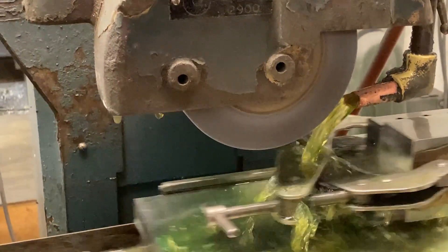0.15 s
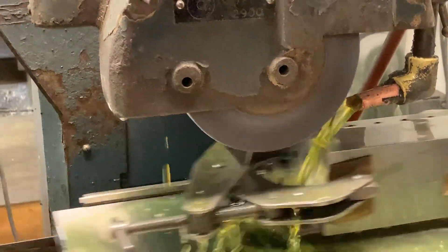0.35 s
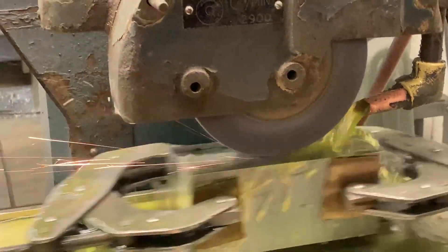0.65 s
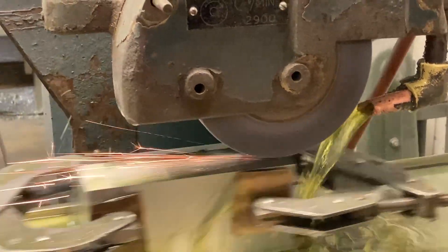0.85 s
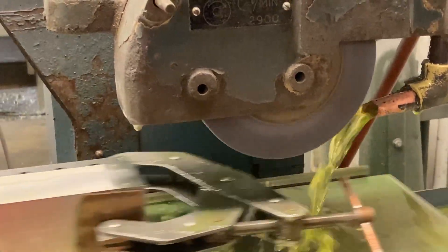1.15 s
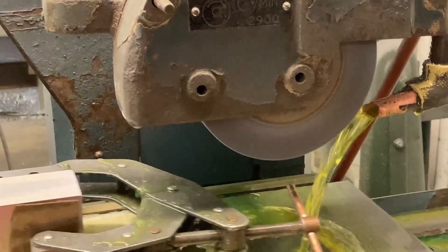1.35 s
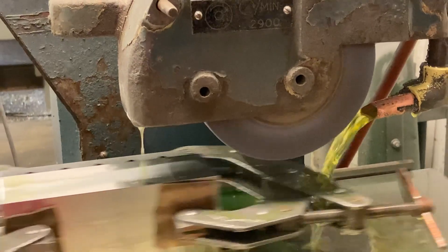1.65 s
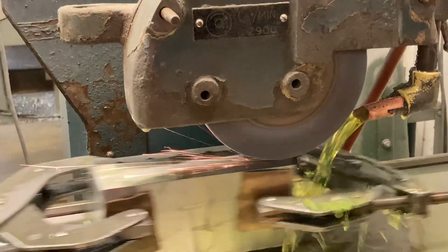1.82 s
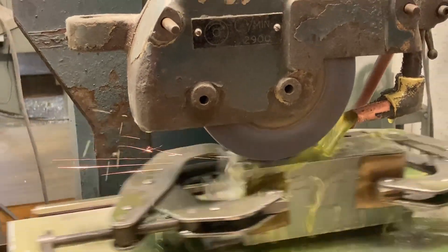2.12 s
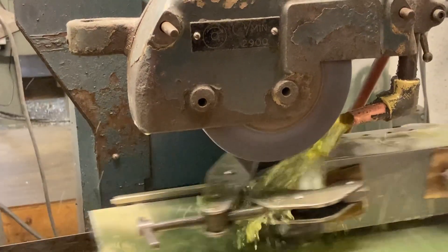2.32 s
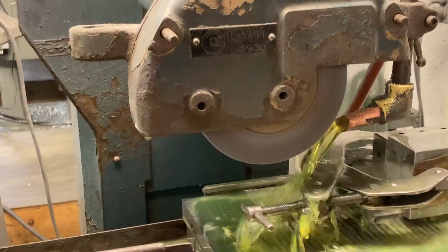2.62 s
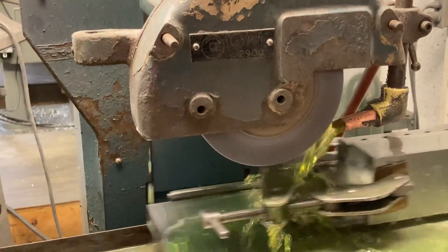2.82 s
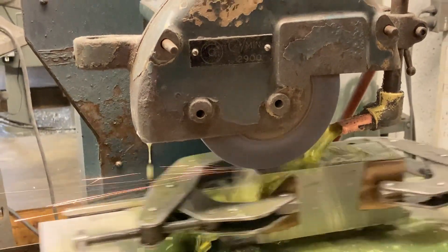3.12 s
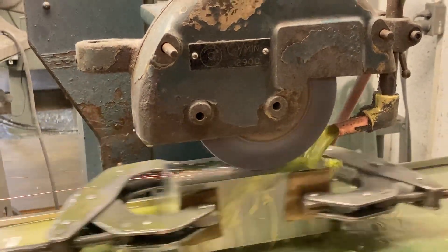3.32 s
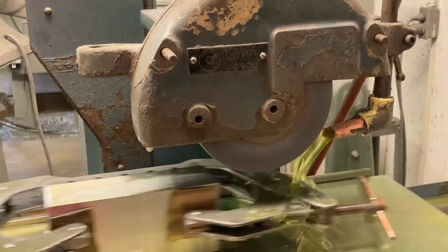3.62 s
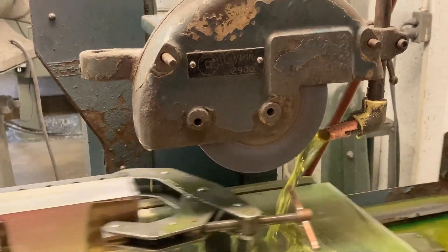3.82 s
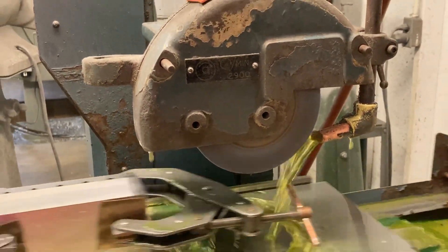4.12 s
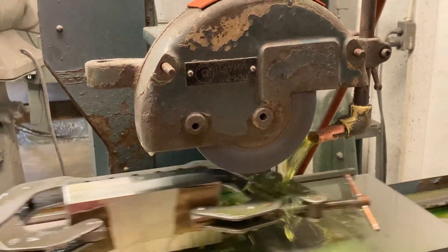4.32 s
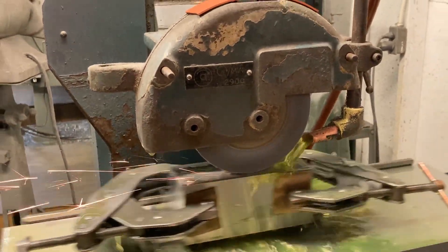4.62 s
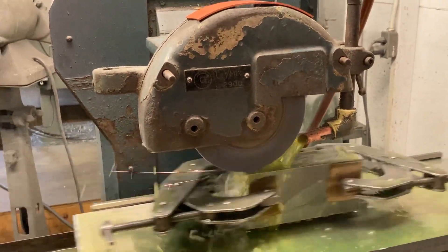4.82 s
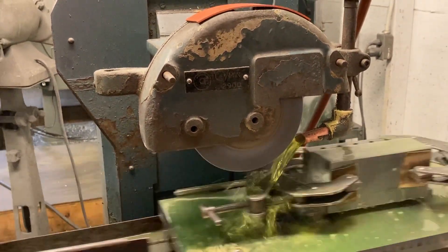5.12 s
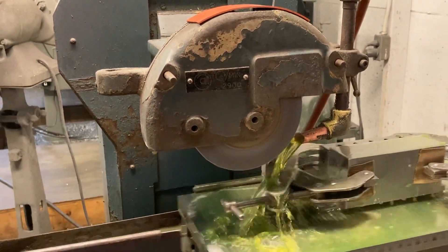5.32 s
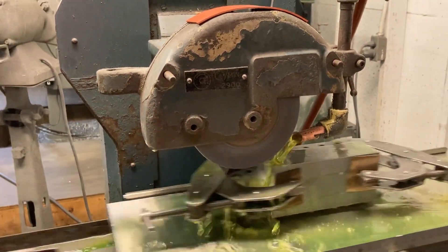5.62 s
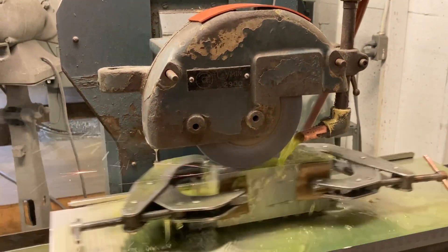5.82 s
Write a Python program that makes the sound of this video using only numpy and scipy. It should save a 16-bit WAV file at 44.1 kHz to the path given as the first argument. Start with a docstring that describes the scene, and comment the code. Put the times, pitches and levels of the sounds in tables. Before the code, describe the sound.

A surface grinder runs close by with a throbbing hum, a motor whine and a light hiss of coolant spray. Five times its wheel scrapes over a steel block with a brief, high, ringing hiss. Between passes a lever clanks, a ratchet rattles quickly and the heavy table reverses with a dull thud. The cycle repeats evenly, with almost no echo.

```python
"""A ratchet rattles over the hum of pump, motor and coolant: a surface grinder at work, close by.
Its table swings to and fro, and five times the wheel scrapes over a steel block, so that wheel,
block and guard sing. At each end a dog knocks the reversing lever, the cross-feed pawl clicks over
its teeth and the table thuds round. Nearby metal and walls add a very short tail."""
import sys
import numpy as np
from scipy import signal
from scipy.fft import rfft, irfft
from scipy.io import wavfile
from scipy.ndimage import uniform_filter1d, map_coordinates

SR = 44100
rng = np.random.default_rng(int(sys.argv[2]) if len(sys.argv) > 2 else 0)


def generate_wav(signal):
    """Clip the signal to [-1, 1] and save it as 16-bit WAV at the path in sys.argv[1]."""
    frames = np.transpose(np.atleast_2d(signal))
    scaled = np.clip(frames, -1, 1) * 32767
    pcm = np.round(scaled).astype(np.int16)
    wavfile.write(sys.argv[1], SR, pcm)


N = 262836
T = np.arange(N) / SR
F = np.arange(N // 2 + 1) * SR / N


def undb(db):
    return 10 ** (np.asarray(db) / 20)


def level(x, db):
    return x * undb(db) / np.sqrt(np.mean(x ** 2))


def through(x, response):
    return irfft(rfft(x) * response, N)


def over_hz(points):
    """A curve through (f/Hz, value) points on a log frequency axis."""
    hz, value = np.transpose(points)
    return np.interp(np.log(F + 1), np.log(hz), value)


def rings(modes):
    """Resonator bank of damped modes (f/Hz, width/Hz, peak level/dB), alternating in polarity."""
    return sum((-1) ** k * undb(db) * 1j * F * width / (hz ** 2 - F ** 2 + 1j * F * width)
               for k, (hz, width, db) in enumerate(modes))


def walk(rate):
    """Smooth random modulator: rate new values a second, spread near 1."""
    hold = int(SR / rate)
    steps = np.repeat(rng.standard_normal(N // hold + 1), hold)
    return 1.3 * uniform_filter1d(uniform_filter1d(steps, hold), hold)[:N]


def gate(spans):
    """Soft gate, open from each row's start to its end."""
    return uniform_filter1d(sum((T > start) & (T < end) for start, end, *_ in spans) * 1., 2000)


def blows(times, db, decay_s, rough):
    """Exciter: each blow is a sharp impact plus a dying scrape, which has the share rough of the energy."""
    size = 2000
    scrape = rng.standard_normal((len(times), size)) * np.exp(-np.arange(size) / SR / decay_s)
    forces = np.sqrt(rough) * scrape / np.sqrt(np.sum(scrape ** 2, axis=1, keepdims=True))
    forces[:, 0] += np.sqrt(1 - rough)
    out = np.zeros(N + size)
    for s, gain, force in zip(times, undb(db), forces):
        out[int(s * SR):int(s * SR) + size] += gain * force
    return out[:N]


def strike(force, body):
    """Rings a body, scaled so that a unit impact peaks near 1."""
    return through(force, body / np.abs(irfft(body[::6])).max())


# stereo image, how alike left and right are (f/Hz, share/0-1)
LIKENESS = [(100, 0.94), (350, 1), (750, 0.89), (1000, 0.23), (1600, 0.21), (2600, 0.12), (5000, 0),
            (6200, 0.7), (7000, 0.4), (8600, 1), (16000, 0.75)]
# EQ of motor rumble, fan and coolant hiss (f/Hz, relative level/dB)
RUMBLE_EQ = [(28, -47), (52, -0.5), (110, -0.5), (230, 1), (310, 0.5), (400, -7.5), (480, -4), (600, -0.5),
             (720, -3.5), (950, -15.5), (1400, -12), (3300, -16.5), (4200, -19.5), (7000, -28.5),
             (11000, -29), (15600, -35.5)]


def motor_and_fan():
    """Stereo noise bed: a wavering rumble and hiss, partly unrelated left and right."""
    alike = over_hz(LIKENESS)
    common, *sides = rfft(rng.standard_normal((3, N)) * undb(1.74 * walk(9.4)))
    noise = np.sqrt(alike) * common + np.sqrt(1 - alike) * np.array(sides)
    return level(irfft(noise * undb(over_hz(RUMBLE_EQ)), N), db=-30)


def coolant():
    """Coolant flung off the wheel: about 500 droplets a second in a bright spray."""
    drops = (rng.random(N) < 500 / SR) * undb(2 * rng.exponential(size=N)) * rng.choice([-1, 1], N)
    splash = through(drops, rings([(2410, 700, 3.7), (8100, 4500, 15.0)]))
    spray = through(rng.standard_normal(N), rings([(8300, 4900, 0)]) ** 2)
    return level(splash, db=-53) + level(spray, db=-45) * undb(0.2 * walk(3))


# fader ride of the draught (t/s, level/dB)
DRAUGHT_RIDE = [(0.0, -58), (0.5, -55), (1.6, -65), (1.8, -48), (3.0, -47), (4.4, -42), (4.83, -52),
                (5.3, -41), (5.6, -44), (5.96, -62)]


def draught():
    """Air off the wheel buffets the microphone: a sub-bass flutter."""
    buffet = through(rng.standard_normal(N), rings([(37.2, 16, 0)]) ** 2)
    return level(buffet, db=0) * undb(np.interp(T, *np.transpose(DRAUGHT_RIDE)))


# pump harmonics (multiple of the stroke rate, relative level/dB)
PUMP_HARMONICS = [(1, -0.5), (2, -10.5), (3, -15.5)]
# swells in the hum as the table turns round (t/s, boost/dB)
PUMP_SWELLS = [(.13, 3), (1.48, 4), (2.89, 1.5), (4.079, 3), (5.37, 3.5)]
PUMP_HZ, PUMP_DB, SWELL_S, THROB_HZ = 155.06, -33, 0.22, 6.42


def pump():
    """Pump strokes hum on a throbbing fundamental; the hum rises and thins while the cross-feed runs."""
    feeding = gate(FEED_RUNS)
    phase = 2 * np.pi * np.cumsum(PUMP_HZ + 1.57 * feeding + 0.411 * walk(8)) / SR
    swell_db = sum(db * np.exp(-((T - s) / SWELL_S) ** 2) for s, db in PUMP_SWELLS)
    throb_db = 2 * np.cos(2 * np.pi * THROB_HZ * (T - .118))
    hum_db = PUMP_DB - feeding + swell_db + 1.5 * walk(7.2)
    out = 0
    for order, db in PUMP_HARMONICS:
        gain = undb(hum_db + db + (order == 1) * throb_db + 1.55 * order * walk(12))
        out += np.sqrt(2) * gain * np.sin(order * phase)
    return out


# motor and spindle tones (f/Hz, rms level/dB, change under load/dB)
WHINE_TONES = [(597.5, -45, 5), (1196, -49.5, -2), (1245, -47.5, -6), (3263, -54.5, -6)]


def whines():
    """Motor and spindle whine, wavering in pitch and level; the balance shifts while the wheel cuts."""
    load, out = gate(WHEEL_PASSES), 0
    for hz, db, load_db in WHINE_TONES:
        phase = 2 * np.pi * np.cumsum(hz * (1 + .006 * walk(30))) / SR
        out += np.sqrt(2) * undb(db + load_db * load + 4 * walk(28)) * np.sin(phase)
    return out


# thud cues (t/s, level/dB)
THUD_CUES = [(1.417, -11), (1.462, -14.5), (1.488, -18), (2.69, -15.5), (4.024, -12), (4.045, -25),
             (4.096, -16.5), (5.301, -23.5)]
# low body of the machine bed (f/Hz, width/Hz, level/dB)
BED_MODES = [(102, 42, -3.5), (202, 30, 4), (297, 50, 0), (560, 63, -6)]


def table_thuds():
    """The heavy table turns round with a slow push, so the bed answers with a dull thud."""
    lowpass = 1 / (1 + 1j * F / 500) ** 2
    return strike(blows(*np.transpose(THUD_CUES), decay_s=0.14, rough=0.66), rings(BED_MODES) * lowpass)


# tap cues (t/s, level/dB)
TAP_CUES = [(0.446, -28), (1.378, -12), (4.002, -11.5), (4.08, -15)]
# ring of the linkage (f/Hz, width/Hz, level/dB)
LINKAGE_MODES = [(990, 20, 12), (1160, 150, 6), (2100, 530, -3), (6000, 8500, -14.5)]


def linkage_taps():
    """The linkage settles with light metal taps."""
    return strike(blows(*np.transpose(TAP_CUES), decay_s=0.0045, rough=0.68), rings(LINKAGE_MODES))


# dog hits (t/s, level/dB, crack offset/dB, valve offset/dB)
KNOCK_CUES = [(1.138, -2, -0.5, -11.5), (2.439, -2.5, 0.5, -28), (3.7652, -3.5, -1.5, -12),
              (5.0638, -5, 0.5, -35)]
# clank of the lever under the left and the right dog (f/Hz, width/Hz, level/dB)
LEFT_DOG_MODES = [(700, 220, -11.5), (1070, 84, -0.5), (1540, 200, -1), (2060, 510, 5), (2710, 410, -2.5),
                  (3170, 320, -0.5), (3940, 470, -5.5), (4630, 480, -6)]
RIGHT_DOG_MODES = [(570, 130, 2), (1000, 140, 3), (1240, 330, 4.5), (1465, 290, 7), (1900, 420, 5.5),
                   (2734, 210, 0.5), (3600, 350, -2.5), (4700, 590, -16)]
GRAZE_DB, RATTLE_DB, VALVE_LAG_S = -16, -5.5, 0.013


def lever_knocks():
    """The dogs take turns to graze, hit and rattle the lever; a crack on top, a valve knock just after."""
    times, levels, crack_db, valve_db = np.transpose(KNOCK_CUES)
    out = 0
    for side, modes in enumerate([LEFT_DOG_MODES, RIGHT_DOG_MODES]):
        s, db = times[side::2], levels[side::2]
        hit = blows(s + 0.00037, db, decay_s=0.0022, rough=0.65)
        graze = blows(s - 0.004, db + GRAZE_DB, decay_s=0.0067, rough=1)
        rattle = blows(s + 0.0047, db + RATTLE_DB, decay_s=0.031, rough=0.86)
        out += strike(graze + hit + rattle, rings(modes))
    crack = blows(times, levels + crack_db, decay_s=0.0018, rough=0.88)
    out += strike(crack, rings([(4160, 450, 1), (7400, 1140, 3), (12100, 7200, -4)]))
    valve = blows(times + VALVE_LAG_S, levels + valve_db, decay_s=0.0016, rough=0.052)
    return out + strike(valve, rings([(577.6, 75, 2.4), (700, 58, 6), (420, 43, 1.2)]))


# cross-feed bursts (first t/s, last t/s, teeth, pawl level/dB, ramp over the run/dB,
# housing offset/dB, cover offset/dB, speed-up/-1..1)
FEED_RUNS = [(-.088, 0.081, 12, -15.5, 6, -3.5, -6, -0.041),
             (1.239, 1.395, 11, -14, 3.5, -3.5, -14.5, 0.17), (2.541, 2.714, 12, -14, 3, -4, -7.5, -0.077),
             (3.881, 4.014, 10, -15, -1, -3.5, -11, .12), (5.163, 5.327, 12, -16.5, 2, -0.5, -11, -0.063)]
# lone pawl clicks (t/s, pawl level/dB, housing offset/dB, cover offset/dB)
CLICK_CUES = [(0.344, -13, -3, -12.5), (0.382, -13, -3, -11), (1.66, -11.5, -8, -13), (2.998, -12, -4, -13),
              (4.293, -12, -7, -16), (5.602, -11, -3.5, -16), (5.645, -6.5, -9, -21)]
FIRST_GAP, LAST_GAP = 1.35, 1.55  # stretch factors: the ratchet starts and stops slowly


def teeth():
    """The pawl runs over rows of teeth: one cue a tooth, merged with the lone clicks."""
    cues = list(map(tuple, CLICK_CUES))
    for first, last, count, db, ramp_db, housing_db, cover_db, speedup in FEED_RUNS:
        gaps = 1 - speedup * np.linspace(-1, 1, round(count) - 1)
        gaps[[0, -1]] *= FIRST_GAP, LAST_GAP
        along = np.r_[0, np.cumsum(gaps)] / gaps.sum()
        jitter_db = (rng.standard_normal((len(along), 3)) * [1.6, 1.2, 1.2]).T
        ends_db = -1 * (along % 1 == 0)  # first and last tooth sit a touch lower
        last_db = -3 * (along == 1)  # housing and cover answer the last tooth less
        pawl_db = db + ramp_db * (along - .5) + ends_db + jitter_db[0]
        cues += zip(first + (last - first) * along, pawl_db,
                    housing_db + last_db + jitter_db[1], cover_db + last_db + jitter_db[2])
    return sorted(cue for cue in cues if cue[0] >= 0)


# bright pawl, its housing and the loose cover plate (f/Hz, width/Hz, level/dB)
PAWL_MODES = [(7800, 340, 0), (7980, 400, -4), (8900, 400, -12), (10700, 400, -14), (12620, 200, 0.5),
              (12780, 200, -0.5), (15000, 1200, -15)]
HOUSING_MODES = [(950, 24, 7), (3230, 430, 6), (4400, 990, -5), (7000, 1200, -8.5)]
COVER_MODES = [(2490, 140, 0), (2030, 160, -12), (4000, 160, -7)]


def ratchet():
    """The pawl snaps down and bounces once, harder in mid-run; housing and cover ring lower."""
    s, db, housing_db, cover_db = np.transpose(teeth())
    turning = np.minimum(np.diff(s, prepend=-1), np.diff(s, append=9)) < .03
    snap = blows(s, db, decay_s=.002, rough=.25)
    bounce = blows(s + .005, db + np.where(turning, -2, -10), decay_s=.0025, rough=.6)
    pawl = strike(snap + bounce, rings(PAWL_MODES) + rings([(4740, 6600, -23)]))
    housing = strike(blows(s, db + housing_db, decay_s=0.016, rough=0.73), rings(HOUSING_MODES))
    cover = strike(blows(s, db + cover_db, decay_s=0.0018, rough=0.3), rings(COVER_MODES))
    return pawl + housing + cover


# wheel speed in turns a second (t/s, f/Hz)
WHEEL_SPEED = [(.7, 51.14), (2.05, 51.07), (3.3, 51.13), (4.7, 51.1), (5.85, 51.14)]
FRESH_SHARE, RUNOUT = 0.24, 0.2  # out of round, the wheel bites harder once a turn


def grit():
    """Scrape texture: the same grains come round every turn and wear slowly; fresh chips add noise."""
    size = 864  # points round the rim
    bins = size // 2 + 1
    phase = 2 * np.pi * rng.random(bins)
    wear_rad = 0.316 * np.linspace(0, 3, bins) ** 0.45  # fine grain wears faster than coarse
    drift = wear_rad * np.cumsum(rng.standard_normal((N // size + 3, bins)), axis=0)
    patches = undb(0.5 * rng.standard_normal(bins))
    rim = irfft(patches * np.exp(1j * (phase + drift)), size).ravel()
    place = np.cumsum(np.interp(T, *np.transpose(WHEEL_SPEED))) * size / SR
    grains = level(map_coordinates(rim, [place], order=5), db=0)
    scrape = np.sqrt(1 - FRESH_SHARE) * grains + np.sqrt(FRESH_SHARE) * rng.standard_normal(N)
    return level(scrape * (1 + RUNOUT * np.sin(2 * np.pi * place / size)), db=0)


# passes over the block (in t/s, out t/s, wheel level/dB, its ramp over the pass/dB,
# upper ring level/dB, guard whistle peak t/s, whistle level/dB)
WHEEL_PASSES = [(0.498, 0.898, -31, 0.5, -32.5, 0.68, -39), (1.844, 2.243, -28.5, 1, -33.5, 2.06, -34),
                (3.129, 3.534, -29, 0, -32.5, 3.28, -35.5), (4.468, 4.876, -31.5, -2.5, -33, 4.74, -36),
                (5.753, 6.156, -31.5, 4.5, -31.5, 5.9, -35)]
ATTACK_S, RELEASE_S, BLOCK_DB = 0.003, 0.012, -34
EDGE_DB, EDGE_S = 3.5, 0.015  # the wheel bites harder at the leading edge
WHISTLE_DROP_DB, WHISTLE_SPAN_S = 11, 0.14


def wheel_contact():
    """Envelopes of the cut for wheel, upper ring, block and guard, each wavering on its own."""
    out = np.zeros((4, N))
    for start, end, wheel_db, ramp_db, upper_db, peak_s, peak_db in WHEEL_PASSES:
        along = np.clip((T - start) / (end - start), 0, 1)
        touch = np.clip((T - start) / ATTACK_S, 0, 1) * np.clip((end - T) / RELEASE_S + 1, 0, 1)
        bite = undb(EDGE_DB * np.exp(-np.abs(T - start) / EDGE_S))
        guard_db = peak_db - WHISTLE_DROP_DB * (1 - np.exp(-((T - peak_s) / WHISTLE_SPAN_S) ** 2))
        for envelope, db in zip(out, [wheel_db + ramp_db * (along - .5), upper_db, BLOCK_DB, guard_db]):
            envelope += touch * bite * undb(db)
    return out * undb([1.23 * walk(10) for _ in out])


# the four singing layers of the cut (f/Hz, width/Hz, relative level/dB)
WHEEL_MODES = [(5930, 34, -21), (6790, 40, -12), (7204, 20, 12), (7480, 40, -2), (7970, 380, -14.5)]
UPPER_MODES = [(10170, 85, -10), (10600, 90, -7), (11000, 68, -14), (11708, 20, 4), (12116, 24, 10),
               (15650, 130, -12)]
BLOCK_MODES = [(921, 14, -6), (1125, 12, 4), (1431, 13, 5), (1535, 18, -4), (1770, 110, -6), (1690, 50, -2),
               (1935, 60, 0), (2320, 60, -1), (2930, 50, -3), (3063, 20, 0), (3476, 16, 9), (3700, 60, -5),
               (4150, 150, -6), (4344, 24, -3), (4900, 200, -10)]
GUARD_MODES = [(3117, 20, -12), (3270, 20, 8)]
# EQ of the hiss between each layer's modes (f/Hz, relative level/dB)
WHEEL_EQ = [(4500, -22.5), (5500, -25.5), (7000, -52), (8000, -23), (9000, -61), (9800, -24)]
UPPER_EQ = [(8500, -26.5), (9500, -29), (11000, -11.5), (12200, -18), (13000, -51), (16000, -73)]
BLOCK_EQ = [(700, -24), (1300, -38), (2000, -28.5), (2600, -31), (3100, -15), (4200, -16), (6000, -18)]
GUARD_EQ = [(2600, -50), (3000, -36), (3500, -42), (3900, -45)]


def grinding():
    """One scrape drives wheel, block and guard while the wheel touches; they ring on after it leaves."""
    scrape, out = grit(), 0
    layers = [(WHEEL_MODES, WHEEL_EQ), (UPPER_MODES, UPPER_EQ),
              (BLOCK_MODES, BLOCK_EQ), (GUARD_MODES, GUARD_EQ)]
    for envelope, (modes, hiss) in zip(wheel_contact(), layers):
        body = rings(modes) + undb(over_hz(hiss))
        out += through(scrape * envelope, body / np.sqrt(np.mean(np.abs(body) ** 2)))
    return out * (T > WHEEL_PASSES[0][0])  # nothing rings before the first touch


ROOM_T60_S = 0.069
SUSTAIN_DRY, HIT_DRY = .7, .45  # share of the scatter that arrives direct instead


def scene():
    """The mix: direct sound on both sides, and a different short tail on each from metal and walls."""
    tails = rng.standard_normal((2, SR // 2)) * np.exp(-np.log(1000) * T[:SR // 2] / ROOM_T60_S)
    scatter = rfft(tails / np.sqrt(np.sum(tails ** 2, axis=1, keepdims=True)), N)
    alike = over_hz(LIKENESS)

    def room(dry_share):
        direct = alike + dry_share * (1 - alike)
        return np.sqrt(direct) + np.sqrt(1 - direct) * scatter

    # sustained sounds take only the tail's phase, so hum and ring stay steady and balanced left and right
    room_phase = np.exp(1j * np.angle(room(SUSTAIN_DRY)))
    sustained = rfft(grinding() + pump() + whines()) * room_phase
    hits = rfft(ratchet() + lever_knocks() + linkage_taps() + table_thuds()) * room(HIT_DRY)
    return irfft(sustained + hits, N) + motor_and_fan() + coolant() + draught()


LEFT_LAG_S, FLIP_HZ, SHELF_HZ, LOWPASS_HZ = 2.2e-4, 940, 15730, 17124


def record(dry):
    """The left side is slightly late and flips polarity above the bass; the top is shelved, then cut."""
    flip = np.pi / (1 + np.exp(np.clip((FLIP_HZ - F) / 40, -50, 50)))
    left = through(dry[0], undb(0.74) * np.exp(1j * flip - 2j * np.pi * F * LEFT_LAG_S))
    shelf = undb(-32 / (1 + np.exp(np.clip((SHELF_HZ - F) / 30, -50, 50))))
    stereo = through(np.array([left, dry[1]]), shelf)
    return signal.sosfilt(signal.ellip(8, .2, 80, LOWPASS_HZ, fs=SR, output="sos"), stereo)


dry = scene()
out = record(dry)
generate_wav(out)
```